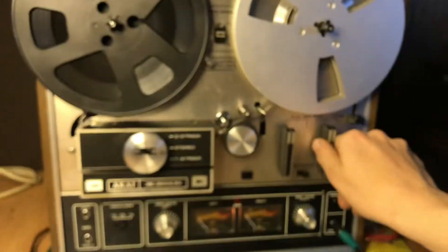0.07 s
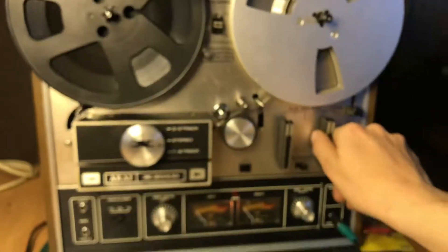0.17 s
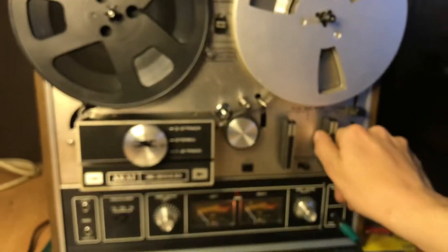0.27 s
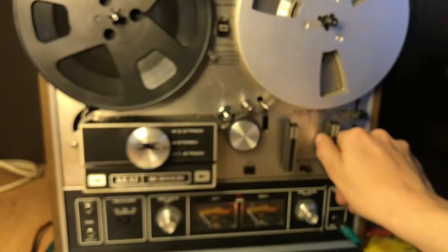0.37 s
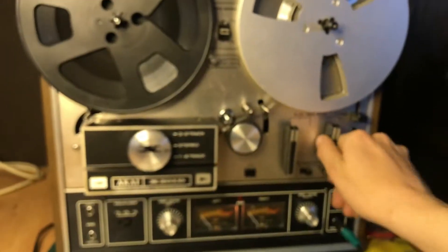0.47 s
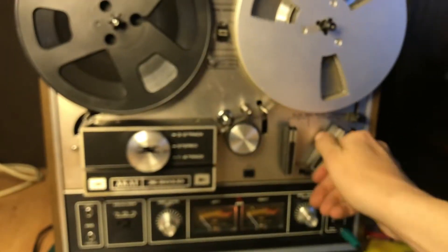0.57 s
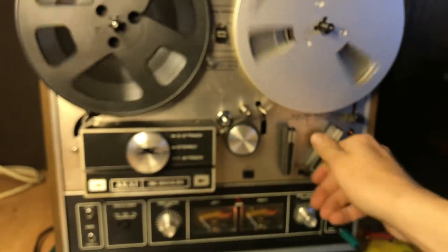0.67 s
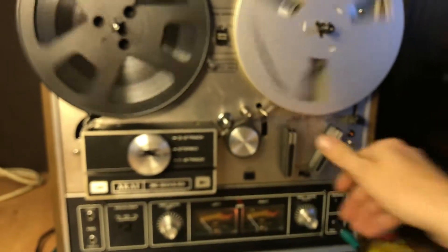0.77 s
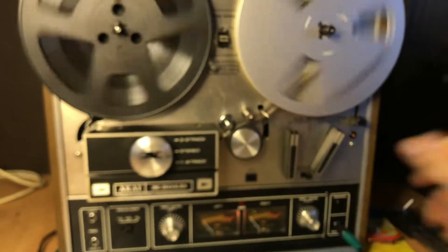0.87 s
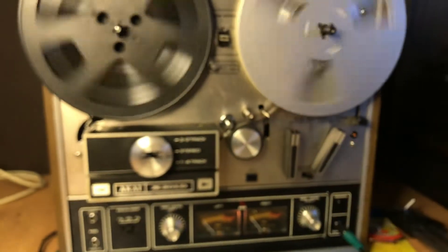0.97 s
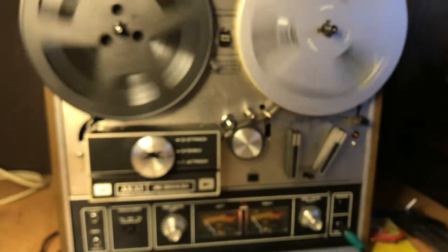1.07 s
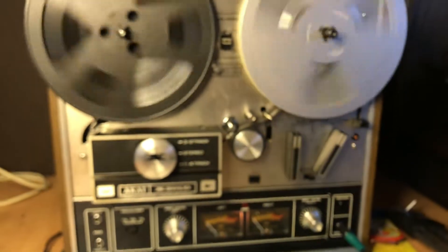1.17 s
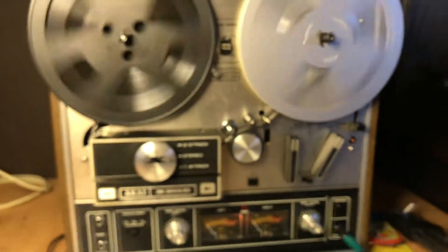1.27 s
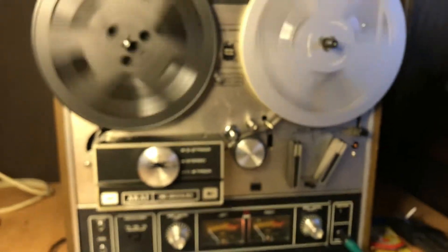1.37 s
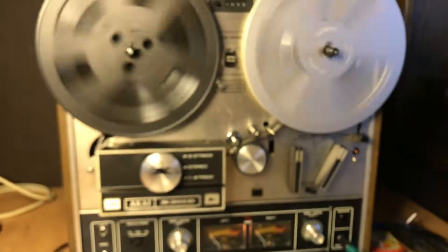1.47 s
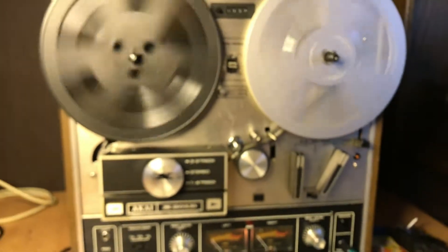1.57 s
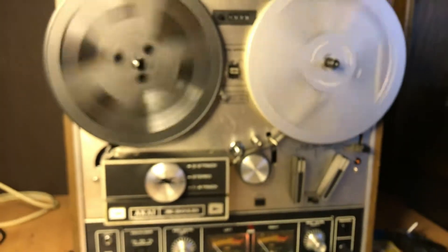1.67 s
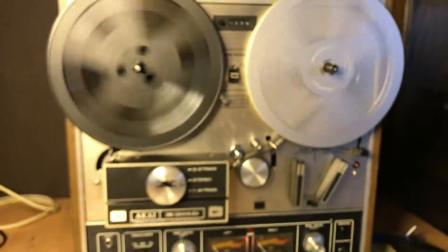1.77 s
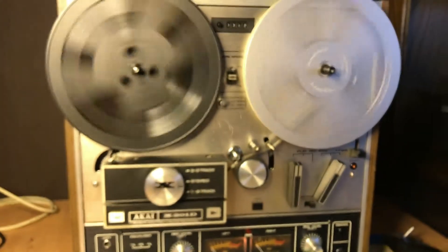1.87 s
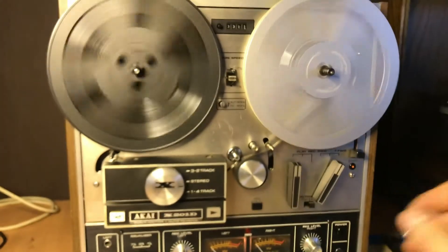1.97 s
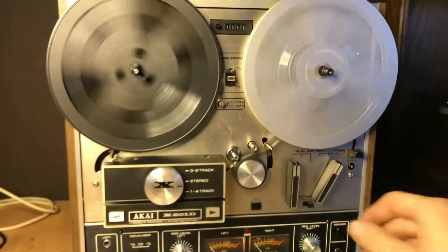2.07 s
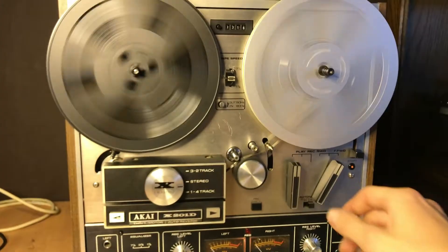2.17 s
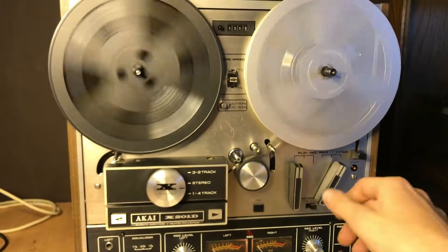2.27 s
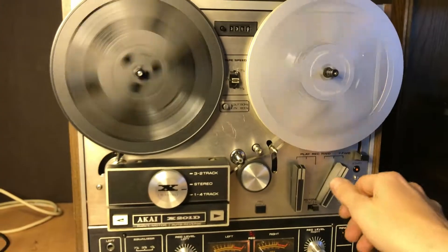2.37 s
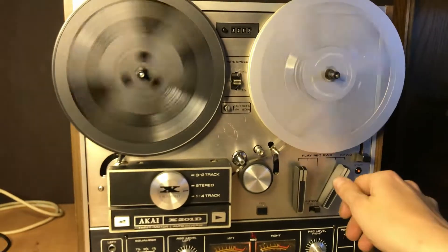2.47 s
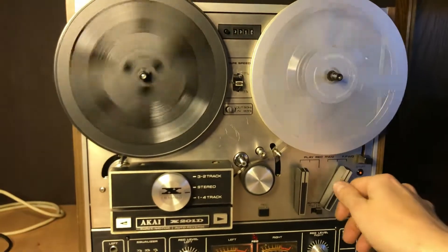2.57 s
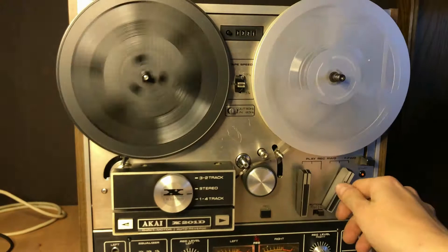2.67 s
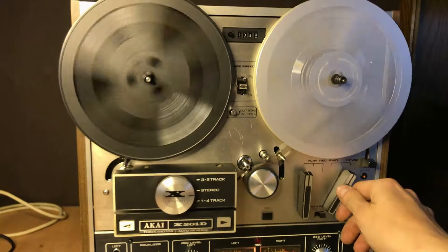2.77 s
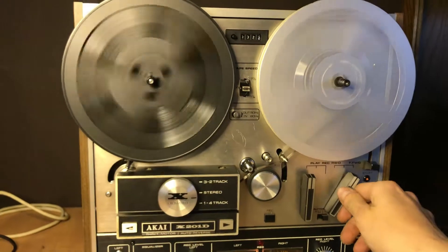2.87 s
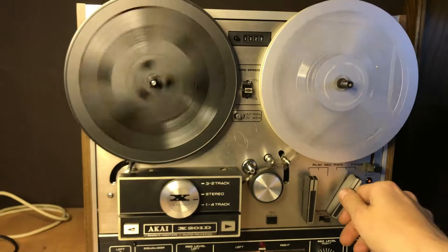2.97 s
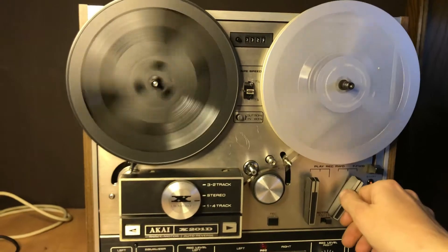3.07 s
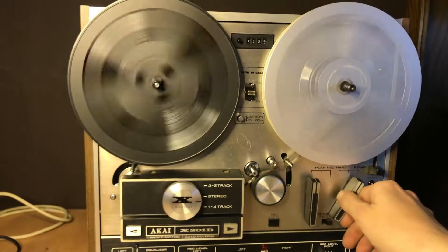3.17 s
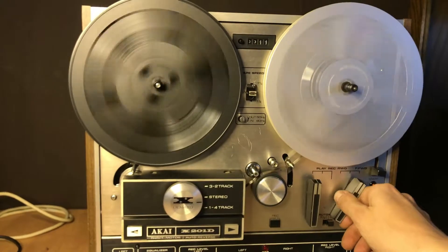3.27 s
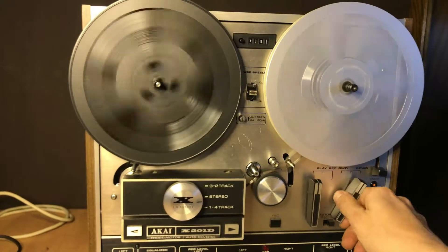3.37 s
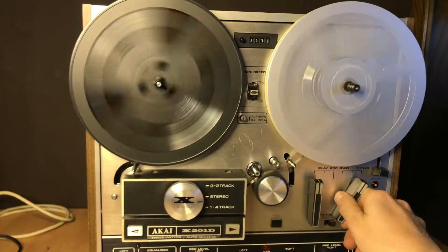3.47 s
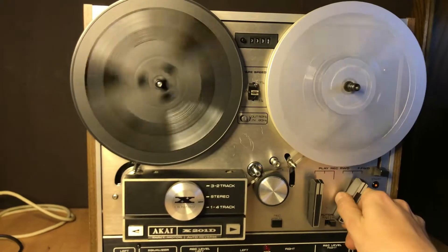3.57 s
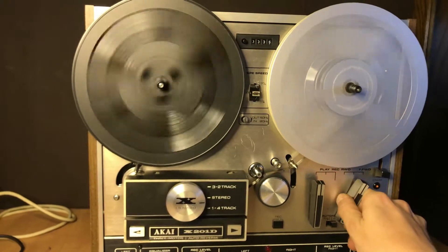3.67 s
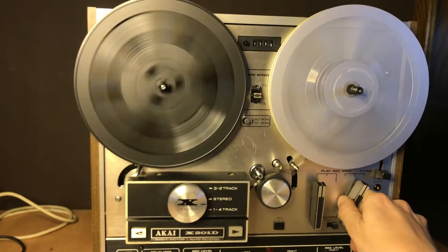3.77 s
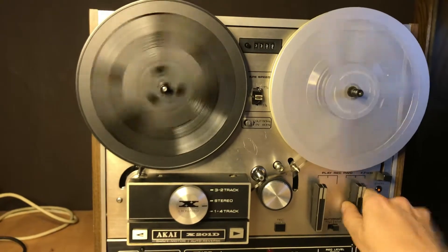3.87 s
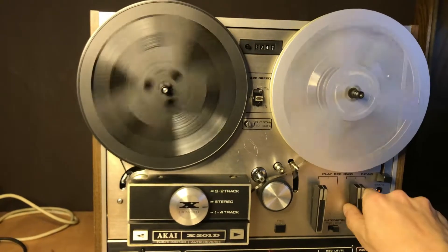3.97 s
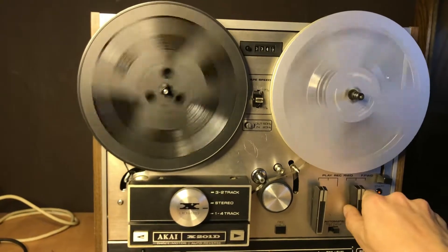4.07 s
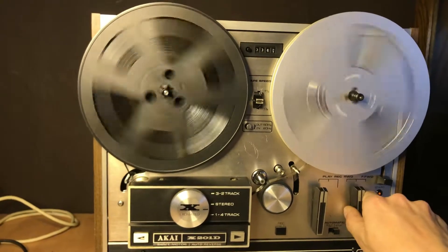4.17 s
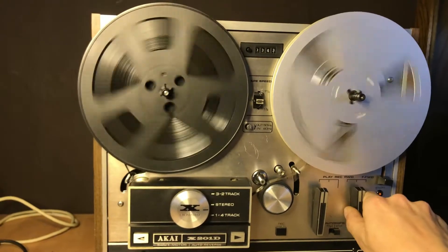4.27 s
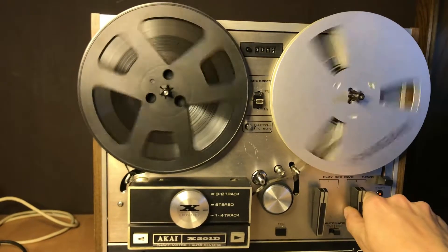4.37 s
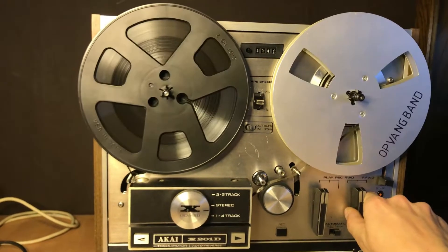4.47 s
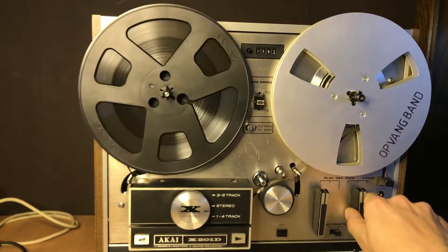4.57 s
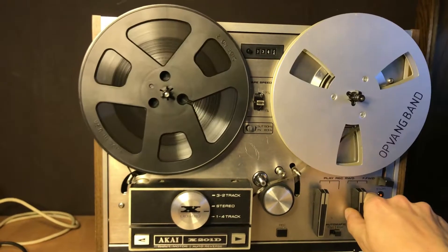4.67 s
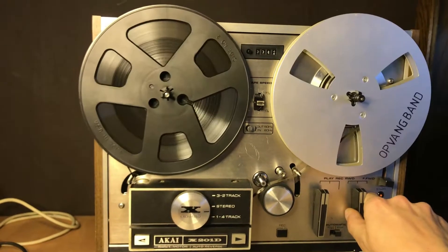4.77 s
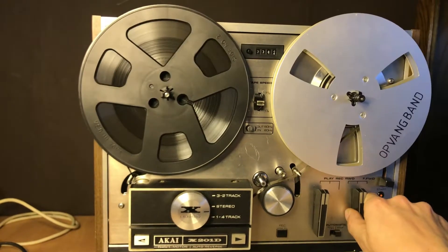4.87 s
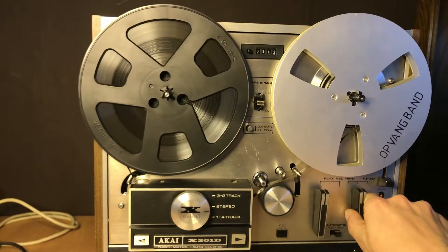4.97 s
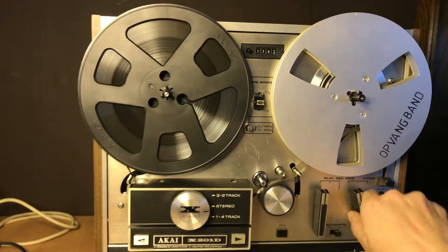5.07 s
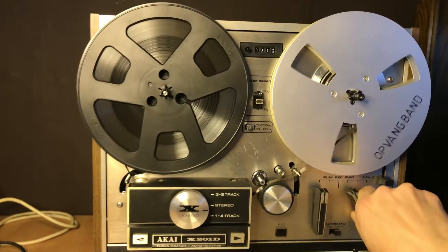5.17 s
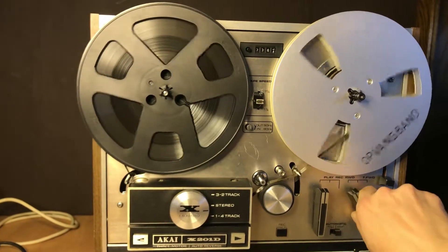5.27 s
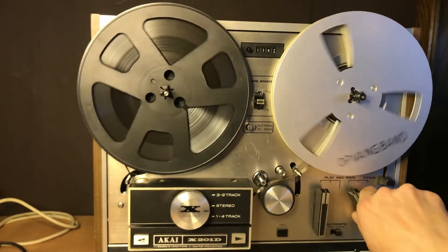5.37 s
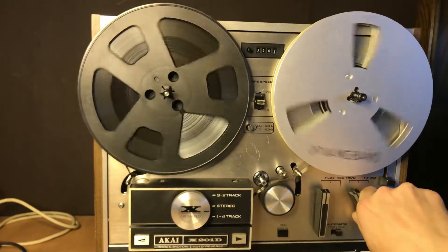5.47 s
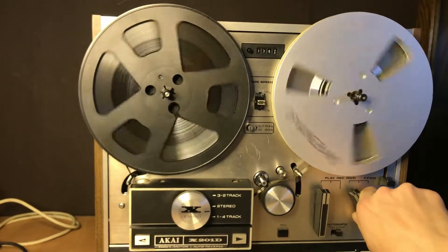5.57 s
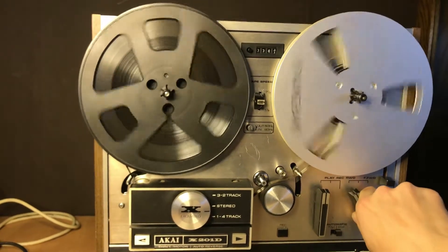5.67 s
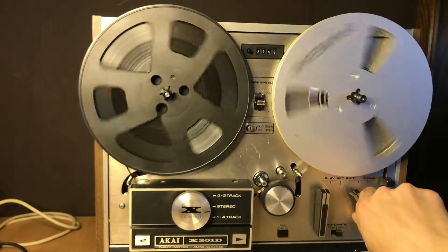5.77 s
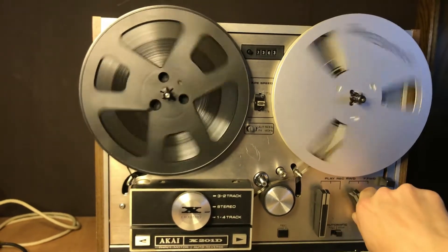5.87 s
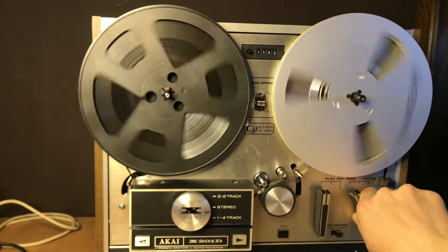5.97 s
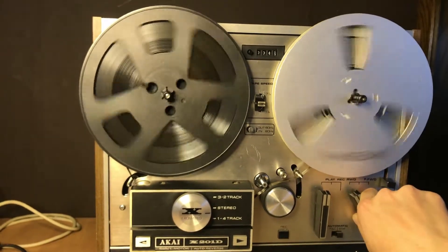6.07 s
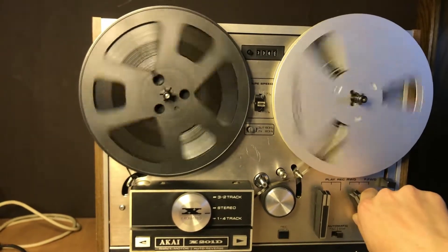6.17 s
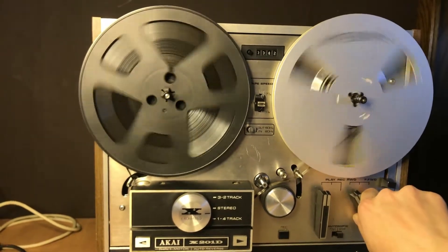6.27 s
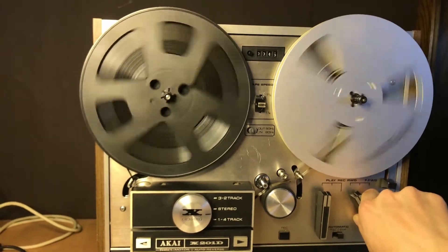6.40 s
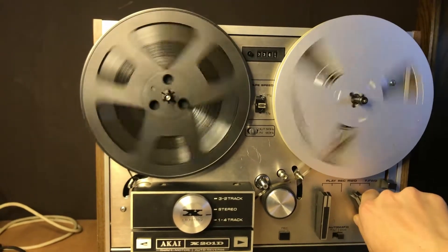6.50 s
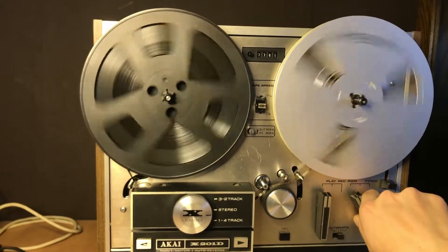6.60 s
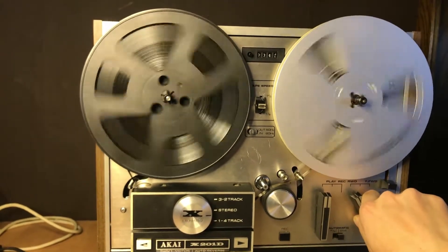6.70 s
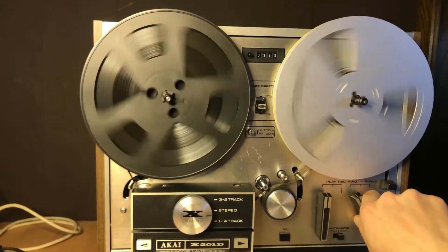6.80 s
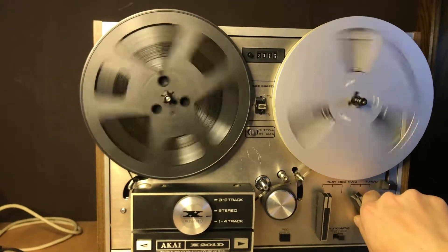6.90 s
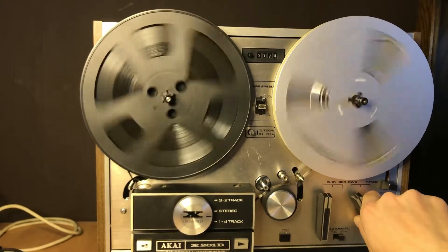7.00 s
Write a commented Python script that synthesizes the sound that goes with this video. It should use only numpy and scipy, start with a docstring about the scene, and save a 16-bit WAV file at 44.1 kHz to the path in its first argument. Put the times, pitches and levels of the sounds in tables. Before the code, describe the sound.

Mechanical lever clicks start tape reels whirring with a growing bright hiss, halted by a sharp clack and chattering brakes before a quieter rewind begins.

```python
"""A tape deck's wind lever, turned three times by hand in a quiet room, close to a hand-held microphone.
Each turn clacks as a run of blows that ring chassis and linkage modes, with bright noise cracks; a low
gliding groan rings on after the second. The reels speed up with a resonant hiss of merging tape-edge
ticks; brake pads chatter and squeal them to rest as noise bursts and gliding tones, then the reels start
the other way. The motor hums as sines over noise hiss and rumble; falling low tones bump the microphone."""
import sys
import numpy as np
from scipy import signal
from scipy.io import wavfile
from scipy.ndimage import uniform_filter1d

SR = 44100
rng = np.random.default_rng(int(sys.argv[2]) if len(sys.argv) > 2 else 0)


def dump_mix(stems):
    """Bounce the given channels to the path in sys.argv[1] as a 16-bit WAV at rate SR."""
    frames = np.atleast_2d(stems).T  # one column per channel
    limited = np.clip(frames, -1, 1)  # hard clip at full scale
    pcm = np.round(limited * 32767).astype(np.int16)
    wavfile.write(sys.argv[1], SR, pcm)


N = 310243  # length in samples


def gain_of(db):
    """Amplitude factor of a level in dB."""
    return 10 ** (np.asarray(db) / 20)


def evened(x):
    """Scales to rms 1."""
    return x / np.sqrt(np.mean(x ** 2) + 1e-20)


def noise(*shape):
    """White noise."""
    return rng.standard_normal(shape)


def read(points, hz):
    """Reads a curve of (Hz, value) points along a log frequency axis."""
    f, value = np.transpose(points)
    return np.interp(np.log(hz + 1), np.log(f + 1), value)


def add(mix, s, sound):
    """Lays a sound into the mix at s seconds."""
    part = mix[round(s * SR):][:len(sound)]
    part += sound[:len(part)]


def coloured(x, points, peaks=(), peak_db=0):
    """Minimum-phase filter from a spectrum plus resonance peaks, along the last axis; output at rms 1."""
    hz = abs(np.fft.fftfreq(8192, 1 / SR))
    power = gain_of(read(points, hz)) ** 2
    for f, width, db in peaks:
        power = power + gain_of(db + peak_db) ** 2 / (1 + (2 * (hz - f) / width) ** 2) ** 2
    log_gain = np.log(power + 1e-10) / 2
    phase = -signal.hilbert(log_gain).imag
    taps = np.fft.ifft(np.exp(log_gain + 1j * phase)).real[:4096]
    filtered = signal.oaconvolve(np.atleast_2d(x), taps[None], axes=1)[:, :x.shape[-1]]
    return evened(filtered.reshape(x.shape))


def resonate(x, hz, width):
    """Resonance that may glide: shifts the curve hz down to zero, smooths, and shifts back."""
    turn = np.exp(2j * np.pi * np.cumsum(hz * np.ones(len(x))) / SR)
    r = np.exp(-np.pi * width / SR)
    return 2 * (turn * signal.lfilter([1 - r], [1, -r], x / turn)).real


def swell(start, rise, hold, fade_db_per_s):
    """Gain that rises, holds and fades; rise and hold are both counted in seconds from the start."""
    t = np.arange(N) / SR - start
    return np.clip(t / rise, 0, 1) ** 2 * gain_of(-fade_db_per_s * np.maximum(t - hold, 0))


def patchy(x, depth_db):
    """Lets patches of the spectrum swell and sink at random; output at rms 1."""
    hz, t, z = signal.stft(x, nperseg=512, noverlap=384)
    across_hz = uniform_filter1d(noise(*z.shape), 14, 0)
    patches = evened(uniform_filter1d(across_hz, 8, 1))
    return evened(signal.istft(z * gain_of(depth_db * patches), nperseg=512, noverlap=384)[1][:N])


# Colour of the room hiss. Each row: frequency in Hz, spectrum level in relative dB.
ROOM_COLOUR = [(65, -34.5), (110, -3.5), (200, -12), (350, -8), (550, -13), (800, -18), (1200, -19.5),
               (2000, -24.5), (3500, -27.5), (6000, -32.5), (9000, -31), (12500, -34), (16000, -35)]
# Partials of the idling motor. Each row: frequency in Hz, rms level of the steady tone in dB.
MOTOR_HUM = [(50, -75), (118.4, -78), (225, -78), (300, -76.5), (400, -71.5), (500, -84.5), (550, -73.5),
             (600, -86), (625, -85), (776, -82.5)]
# Swells in the low rumble of the hand and the house.
# Each row: centre in seconds, half-width in seconds (to 1/e of the dB rise), rise above the rest in dB.
RUMBLE_SWELLS = [(.05, .25, 4), (1.5, .2, 5), (3.2, .17, 7), (4.15, .4, 9), (5.3, .25, 8), (5.8, .25, 6),
                 (6.8, .3, 2)]
# Colour of that rumble. Each row: frequency in Hz, spectrum level in relative dB.
RUMBLE_SPECTRUM = [(15, -47), (25, -20.5), (38, -7), (50, 3), (65, 2), (85, -13), (120, -11), (160, -16.5),
                   (250, -26), (450, -93)]
ROOM_DB, RUMBLE_DB = -65.5, -67.5  # rms, the rumble's before its swells


def background():
    """Filtered noise for room hiss, slightly wavering sines for motor hum, and a lumpy low rumble."""
    room = gain_of(ROOM_DB) * coloured(noise(N), ROOM_COLOUR)
    t = np.arange(N) / SR
    hum = np.zeros(N)
    for hz, db in MOTOR_HUM:
        steady = np.sqrt(2) * np.sin(2 * np.pi * (hz * t + rng.random()))
        waver = 0.5 * evened(resonate(noise(N), hz, width=15.0))
        hum += gain_of(db) * (steady + waver)
    rumble_db = RUMBLE_DB + sum(db * np.exp(-((t - s) / width) ** 2) for s, width, db in RUMBLE_SWELLS)
    return room + hum + gain_of(rumble_db) * coloured(noise(N), RUMBLE_SPECTRUM)


# Bumps on the microphone. Each row: start in seconds, envelope peak in dB, first pitch in Hz,
# rise time constant in seconds, t60 in seconds.
MIC_BUMPS = [(0.054, -52, 154, 0.0025, 0.11), (1.322, -41, 230, 0.0022, 0.035),
             (1.354, -36.5, 214, 0.014, 0.11), (2.0, -49, 180, .004, .1), (4.438, -50.5, 260, 0.0028, 0.08),
             (5.741, -45, 280, 0.0017, .07), (5.765, -48, 220, .002, .07),
             (5.913, -48.5, 260, 0.0044, 0.083)]
# One small tick amid the bumps: start in seconds, envelope peak in dB, pitch in Hz.
MIC_TICK = (1.3528, -35, 1300)
BUMP_LAST_HZ, BUMP_FALL_S = 55, .007  # pitch the bumps sink to, and time constant of the fall


def bumps():
    """A jolt of the microphone: a few low cycles that fall in pitch."""
    out, t = np.zeros(N), np.arange(SR // 4) / SR
    for s, db, first_hz, rise, t60 in MIC_BUMPS:
        hz = BUMP_LAST_HZ + (first_hz - BUMP_LAST_HZ) * np.exp(-t / BUMP_FALL_S)
        shape = gain_of(-60 * t / t60) * (1 - np.exp(-t / rise))
        add(out, s, gain_of(db) * shape / shape.max() * np.sin(2 * np.pi * np.cumsum(hz) / SR))
    s, db, hz = MIC_TICK
    add(out, s, gain_of(db - 60 * t / 0.0038) * np.sin(2 * np.pi * hz * t))
    return out


def ringing(modes, damping, centre_hz, spread_db, rattle_db):
    """Decaying modes shaken by a short scrape and loose parts rattling after it,
    weaker by spread_db at an octave from the centre; rms 1/3 over the first 10 ms."""
    t = np.arange(SR // 8) / SR
    hz, db, t60 = np.transpose(modes)[:, :, None]
    scrape = np.exp(-t[:2000] / .0014)
    rattle = gain_of(rattle_db) * np.exp(-t[:2000] / 0.012)
    push = noise(len(modes), 2000) * (scrape + rattle)
    # the first contact drives every mode: even out most of the luck of the noise at its frequency
    contact = (push[:, :200] * np.exp(2j * np.pi * hz * t[:200])).sum(1, keepdims=True)
    push /= abs(contact) ** .7
    mode_db = db - spread_db * np.log2(hz / centre_hz) ** 2 - 60 * t / (t60 * damping)
    mode = gain_of(mode_db) * np.sin(2 * np.pi * hz * t)
    out = signal.fftconvolve(mode, push, axes=1)[:, :len(t)].sum(0)
    return out / (3 * out[:SR // 100].std())


# Blows of the lever linkage. Each row: start in seconds, level in dB, linkage centre in Hz, then
# chassis thud in dB relative to that level, thud centre in Hz, crack and airy snap in relative dB.
LEVER_BLOWS = [(0.5377, -64, 2200, 12, 1200, -23, -16), (0.5635, -44, 3600, -9, 870, -8, 0),
               (0.5725, -38, 2290, -1.5, 790, -18, -16), (0.5888, -39.5, 3900, -8, 900, -3, 10.5),
               (.6004, -52, 3600, 9, 796, -18, -8), (.610, -53.5, 2600, 11, 695, -17, -11),
               (0.6185, -49, 3000, 7, 890, -7, 5), (0.6287, -46.5, 2000, 8, 1120, 3, 3),
               (3.9464, -33, 2300, -20, 1200, 1.5, -2), (3.949, -21.5, 2390, -11, 1300, 2.5, 0),
               (3.9511, -22.5, 3200, -4.5, 523, -10, 2.5), (3.9644, -37, 2570, 6, 518, -14, -10),
               (3.9734, -38.5, 2330, 4, 1100, -21, -12), (5.0935, -52.5, 3000, -1, 892, -10, -12),
               (5.1186, -36, 3080, 0, 895, -6.5, -20), (5.1224, -37, 2900, 4, 1290, -13, -20),
               (5.129, -42, 2600, 7.5, 400, -9, -15), (5.1482, -38.5, 3300, -13, 900, -9, 0),
               (5.1674, -43, 3300, -12, 400, -.5, 12), (5.1774, -44, 3340, -10, 600, -10, -6),
               (5.1974, -44, 2300, 4.5, 610, -2.5, -3), (5.209, -49.5, 2300, 8.5, 458, -10, -5),
               (5.2234, -54, 2000, 10, 370, -11, -12)]
# Modes of the chassis. Each row: frequency in Hz, relative level in dB, undamped t60 in seconds.
CHASSIS_MODES = [(250, -7, .05), (371, -1.5, 0.065), (465, -8, 0.02), (527, 2.5, 0.11), (660, -0.5, 0.017),
                 (825, -2.5, 0.079), (874, -2, .05), (993, -3.5, 0.063), (1130, -7.5, 0.12),
                 (1350, -3, 0.016), (1357, 1.5, 0.034), (1500, -4.5, 0.022)]
# Modes of the linkage. Each row: frequency in Hz, relative level in dB, undamped t60 in seconds.
LINKAGE_MODES = [(1900, -4, .022), (2150, -3, .022), (2315, 0, .028), (2600, -2, .025), (2850, -4, .02),
                 (3100, -2, .025), (3330, -3, .022), (3644, -3, .025), (4100, -4, .02), (4640, -6, .02),
                 (5600, -6, .02)]
# Colour of the bright crack. Each row: frequency in Hz, spectrum level in relative dB.
CRACK_COLOUR = [(1500, -62), (3000, -19.5), (6000, 2.5), (9000, -0.5), (11000, -3), (15700, -12.5)]
# Colour of the airy snap. Each row: frequency in Hz, spectrum level in relative dB.
SNAP_COLOUR = [(8000, -18), (11000, -5), (13000, -3), (15700, 2)]
DAMPING = .65  # factor on every t60 of the blows, from the hand that holds the lever


def lever():
    """Each blow rings the chassis and the linkage and gives a short bright crack with a rattle after it."""
    out, t = np.zeros(N), np.arange(SR // 8) / SR
    burst = gain_of(-60 * t / (.022 * DAMPING))
    rattle = gain_of(-11 - 60 * t / (.13 * DAMPING))
    shape = (burst + rattle) * np.minimum(t / 0.0013, 1) ** 1.1
    cracks = coloured(noise(len(LEVER_BLOWS), len(t)), CRACK_COLOUR) * shape
    snaps = coloured(noise(len(LEVER_BLOWS), len(t)), SNAP_COLOUR) * shape
    for blow, crack, snap in zip(LEVER_BLOWS, cracks, snaps):
        s, db, link_hz, thud_db, thud_hz, crack_db, snap_db = blow
        thud = ringing(CHASSIS_MODES, DAMPING, thud_hz, spread_db=11.5, rattle_db=-14.5)
        link = ringing(LINKAGE_MODES, DAMPING, link_hz, spread_db=12.0, rattle_db=-24.5)
        bright = gain_of(crack_db) * crack + gain_of(snap_db) * snap
        add(out, s, gain_of(db) * (gain_of(thud_db) * thud + link + bright))
    return out


# Decay of the room. Each row: frequency in Hz, t60 in seconds.
ROOM_DECAY = [(300, 0.29), (1000, 0.29), (4000, 0.14), (12000, 0.14)]


def reflections(x):
    """Room reflections as sparse taps of random sign, each band dying at its own speed."""
    taps = np.zeros(SR // 2)
    at = np.arange(200, SR // 2 - 20, 20)
    taps[at + rng.integers(0, 20, len(at))] = rng.choice([-1., 1.], len(at))
    hz, t, z = signal.stft(taps, SR, nperseg=256)
    decay = gain_of(-60 * t / read(ROOM_DECAY, hz)[:, None])
    tail = signal.istft(z * decay, SR, nperseg=256)[1]
    return signal.fftconvolve(x, tail / np.linalg.norm(tail))[:N]


def speed(start, spin_up):
    """Reel speed as a share of full speed, closing in on it with the time constant spin_up."""
    return 1 - np.exp(-np.maximum(np.arange(N) / SR - start, 0) / spin_up)


# Colour of the airy top of the wind. Each row: frequency in Hz, spectrum level in relative dB.
AIRY_TOP = [(7000, -49), (9500, -24), (11000, -12.5), (12500, -6.5), (13500, -2.5), (14300, -0.5),
            (15000, -6), (16000, -2)]
# Small random catches of the tape edge: rate per second, peak in dB against the hiss when slow,
# spread in dB. They weaken as the reels gain speed.
RANDOM_CATCHES = (35, 5, 2.0)
HISS_POWER, TOP_POWER = .92, .7  # hiss, and its airy share, as powers of the speed
SLOWING_DB_PER_S = 220  # fade of the wind once braked
TICKS_PER_S, SCATTER_DB = 700, 3.0  # tape-edge ticks: mean rate, and scale of their random rise in level


def winding(start, braked, spin_up, hiss_db, top_db, base, peaks):
    """Tape edges tick on guides and flanges; the ticks merge to a resonant hiss under an airy top,
    both growing with speed."""
    share = speed(start, spin_up)
    level = gain_of(hiss_db) * share ** HISS_POWER * swell(start, .05, braked - start, SLOWING_DB_PER_S)
    tick_gain = gain_of(SCATTER_DB * np.minimum(rng.exponential(1, N), 4))
    ticks = tick_gain * (rng.random(N) < TICKS_PER_S / SR)
    merged = signal.oaconvolve(ticks ** 2, np.exp(-np.arange(900) / 220.0))[:N]
    density = np.sqrt(abs(merged) + 17.0)
    density /= np.sqrt(uniform_filter1d(density ** 2, SR // 4))
    per_s, catch_db, spread_db = RANDOM_CATCHES
    catch_gain = (1 - share) * gain_of(catch_db + spread_db * noise(N))
    catches = catch_gain * (rng.random(N) < per_s / SR)
    catch_decay = gain_of(-60 * np.arange(2000) / SR / .04)
    density = np.hypot(density, signal.oaconvolve(catches, catch_decay)[:N])
    body = patchy(coloured(density * noise(N), base, peaks), depth_db=1.5)
    top = patchy(coloured(density ** .4 * noise(N), AIRY_TOP), depth_db=.8)
    return level * (body + gain_of(top_db) * share ** TOP_POWER * top)


# The reels run forward, then back. Each row: start in seconds, braked in seconds, spin-up time constant
# in seconds, hiss at full speed in dB, airy top at full speed in dB relative to the hiss.
WINDS = [(.72, 4.12, 1.15, -49.7, -2), (5.27, 7.5, 2.5, -57, -3)]
# Broad hiss of the forward wind. Each row: frequency in Hz, spectrum level in relative dB.
FORWARD_BASE = [(180, -39), (300, -11), (451, -15), (516, -2.5), (719, -19), (875, -4.5), (1570, -11.5),
                (2190, -4.5), (3250, -7), (3660, -2), (11000, -20.5), (14300, -41.5), (22000, -120)]
# Guide and flange resonances, forward. Each row: frequency in Hz, width in Hz, relative level in dB.
FORWARD_PEAKS = [(358, 25, -2.5), (512, 25, -0.5), (860, 68, -13), (1320, 260, -6), (1740, 56, -5),
                 (2100, 46, -2.5), (2248, 97, 3.5), (2780, 110, -6), (3646, 66, 3.5), (3750, 200, 1.5),
                 (3970, 210, -2), (4580, 110, -8), (4508, 30, 8), (4720, 160, 1), (5140, 90, -11),
                 (5470, 94, 0), (5820, 180, -1), (6100, 110, -3.5), (6560, 370, -7.5), (7030, 200, -3)]
# Broad hiss of the backward wind. Each row: frequency in Hz, spectrum level in relative dB.
BACKWARD_BASE = [(500, -8), (1200, -9.5), (1900, -4.5), (3300, -6), (4300, -5.5), (5000, -12.5),
                 (6000, -10), (8000, -16.5), (11000, -18.5)]
# Guide and flange resonances, backward. Each row: frequency in Hz, width in Hz, relative level in dB.
BACKWARD_PEAKS = [(2140, 36, 7.5), (2257, 110, 1.5), (2684, 39, 2.5), (2870, 48, -1.5), (3734, 88, 1),
                  (4050, 90, -10), (4350, 60, -2), (4500, 55, -0.5), (5750, 140, -3.5), (7000, 130, -14)]
# The clearest catches of the tape edge on a flange. Each row: start in seconds, peak in dB.
CLEAR_CATCHES = [(1.2431, -49), (2.8464, -41), (6.0681, -52.5), (6.1674, -52), (6.1968, -51.5),
                 (6.4178, -50), (6.5615, -47.5), (6.6079, -51), (6.6937, -53), (6.7955, -49), (6.8154, -52),
                 (6.8538, -50.5)]


def tape():
    """Both wind directions, and single catches of the tape edge as short resonant scrapes."""
    out = winding(*WINDS[0], FORWARD_BASE, FORWARD_PEAKS)
    out += winding(*WINDS[1], BACKWARD_BASE, BACKWARD_PEAKS)
    t = np.arange(3000) / SR
    scrapes = noise(len(CLEAR_CATCHES), len(t)) * gain_of(-60 * t / 0.03) * np.minimum(t / 0.00073, 1)
    rings = coloured(scrapes, BACKWARD_BASE, BACKWARD_PEAKS, peak_db=7.0)
    for (s, db), ring in zip(CLEAR_CATCHES, rings):
        add(out, s, gain_of(db) * ring / abs(ring).max())
    return out


# Groan and squeals: first a low groan that rings on after the lever's blow, then squeals of the pads.
# Each row: start in seconds, length in seconds, first and last pitch in Hz,
# level at the loudest point in dB, place of that point from 0 to 1.
GROAN_AND_SQUEALS = [(4.0, .13, 217, 222, -50, .4), (4.15, .07, 1470, 1480, -44, .4),
                     (4.14, .05, 2430, 2200, -46, .25), (4.14, .05, 9100, 8950, -47, .3),
                     (4.145, .05, 6700, 6500, -51, .6), (4.14, .06, 530, 520, -55, .5),
                     (4.175, .1, 405, 430, -54, .4), (4.225, .065, 1580, 1550, -44, .4),
                     (4.225, .04, 5180, 5230, -54, .3), (4.225, .04, 6650, 6560, -55, .3),
                     (4.228, .055, 2200, 2060, -49, .65), (4.275, .08, 5200, 5180, -52, .3),
                     (4.338, .09, 3920, 3370, -46, .27)]
# Overtones of each of these tones. Each row: multiple of the pitch, dB relative to the fundamental.
TONE_OVERTONES = [(2, -20), (3, -18)]
TONE_ENDS_DB = -12  # ends of each tone against its loudest point


def groan_and_squeals():
    """The low groan after the blow, then the pads' squeals: narrow gliding tones, jittered and gritty."""
    out = np.zeros(N)
    for s, length, first_hz, last_hz, db, place in GROAN_AND_SQUEALS:
        span = np.arange(0, 1, 1 / (length * SR))
        n = len(span)
        pitch = first_hz + (last_hz - first_hz) * span
        jitter = .1 * uniform_filter1d(noise(n), 120)  # in the squeals, stick-slip
        phase = 2 * np.pi * np.cumsum(pitch * (1 + jitter)) / SR
        tone = np.sin(phase)
        for k, overtone_db in TONE_OVERTONES:
            if k * pitch.max() < SR / 2:
                tone += gain_of(overtone_db) * np.sin(k * phase)
        grit = gain_of(1.8 * evened(uniform_filter1d(noise(n), 150)))  # in the squeals, grip comes and goes
        rasp = .5 * evened(resonate(noise(n), pitch, width=.035 * pitch.mean()))
        drive = evened(grit * (tone + rasp))
        peak_at = np.clip(place, .05, .95)
        arch_db = np.interp(span, [0, peak_at, 1], [TONE_ENDS_DB, 0, TONE_ENDS_DB])
        add(out, s, gain_of(db + arch_db) * drive * signal.windows.tukey(n, .2))
    return out


# Grips of the brake pads. Each row: start in seconds, length in seconds, rub level in dB,
# slips per second, slip peak in dB before its random spread.
PAD_GRIPS = [(4.139, .043, -45, 180, -29), (4.224, .017, -48.5, 112, -32), (4.2608, .019, -49, 150, -35)]
# Steady drag to rest: start in seconds, rub level in dB, hold in seconds, fade in dB per second.
PAD_DRAG = (4.19, -54.5, .21, 190)
# Colour of the rub. Each row: frequency in Hz, spectrum level in relative dB.
RUB_SPECTRUM = [(350, -39), (600, -17), (660, -32), (757, -24), (1420, -13), (2700, -12), (3690, -10.5),
                (4470, -18), (5190, -12.5), (6120, -15), (15700, -25)]
# Resonances of the brake drum. Each row: frequency in Hz, width in Hz, relative level in dB.
DRUM_PEAKS = [(1520, 230, 0), (2200, 300, 2), (3860, 400, 5.5), (5230, 250, -9), (6600, 450, 4.5),
              (8840, 500, -1), (12200, 600, 1), (14500, 900, -1)]
GRIP_RISE_S, GRIP_FALL_S = .012, .015  # the fall is the time to drop 20 dB


def rubbing():
    """Pads rub the drum: patchy coloured noise that follows the drag and the grips."""
    start, db, hold, fade = PAD_DRAG
    level = gain_of(db) * swell(start, GRIP_RISE_S, hold, fade)
    for s, length, db, *_ in PAD_GRIPS:
        level += gain_of(db) * swell(s - GRIP_RISE_S, GRIP_RISE_S, GRIP_RISE_S + length, 20 / GRIP_FALL_S)
    return level * patchy(coloured(noise(N), RUB_SPECTRUM, DRUM_PEAKS, peak_db=-15.5), depth_db=3.5)


# Colour of a slip under the drum's ring. Each row: frequency in Hz, spectrum level in relative dB.
SLIP_COLOUR = [(600, -67), (1200, -5), (15700, -4.5)]
SLIP_SPREAD_DB = 3.0  # plus or minus on each slip


def slips():
    """Pads slip in quick bursts, each a short noise snap that rings the drum."""
    out, t = np.zeros(N), np.arange(1500) / SR
    for start, length, _, rate, db in PAD_GRIPS:
        times = np.arange(start, start + length, 1 / rate)
        snaps = noise(len(times), len(t)) * gain_of(-60 * t / .007)
        for s, ring in zip(times, coloured(snaps, SLIP_COLOUR, DRUM_PEAKS)):
            slip_db = db + SLIP_SPREAD_DB * rng.uniform(-1, 1)
            add(out, s, gain_of(slip_db) * ring / abs(ring).max())
    return out


def scene():
    """All layers; only the lever's clacks are given room reflections."""
    clacks = lever()
    echoes = gain_of(-7) * reflections(clacks)
    brakes = groan_and_squeals() + rubbing() + slips()  # with the groan just before them
    return (background() + bumps() + clacks + echoes + tape() + brakes)[None]


# Shallow treble dip of the microphone: centre in Hz, width in Hz, depth in dB.
TREBLE_DIP = (10470, 1170, -3)
EDGE_HZ = 15765  # upper edge of the sound's band


def record(dry):
    """The microphone has a shallow dip in the treble; then a steep low-pass at the band's upper edge."""
    hz, width, db = TREBLE_DIP
    around_dip = signal.lfilter(*signal.iirpeak(hz, hz / width, SR), dry)
    dipped = dry - (1 - gain_of(min(db, 0))) * around_dip
    lowpass = signal.firwin(2047, EDGE_HZ, window=("kaiser", 9), fs=SR)
    return signal.oaconvolve(dipped, lowpass[None], "same")


dry = scene()
out = record(dry)
dump_mix(out)
```